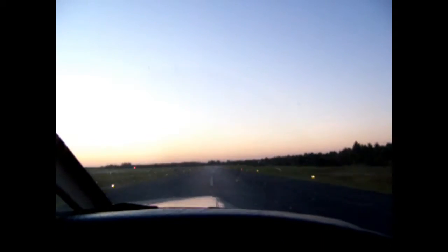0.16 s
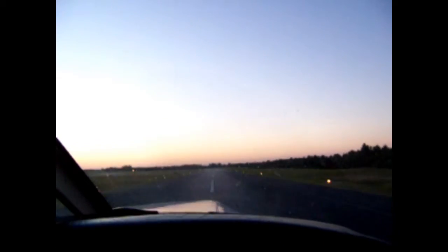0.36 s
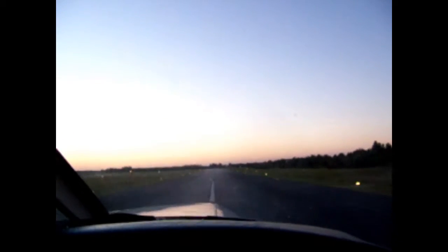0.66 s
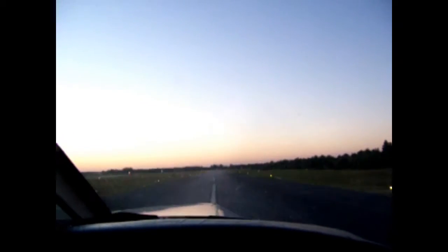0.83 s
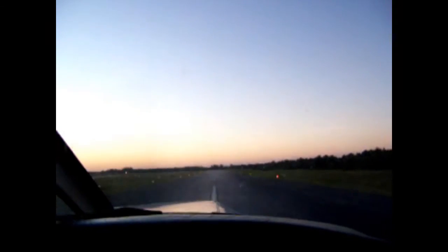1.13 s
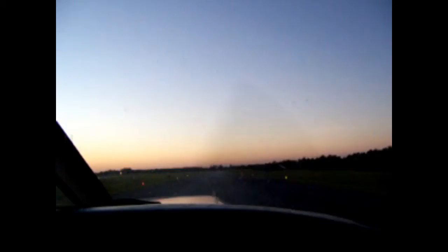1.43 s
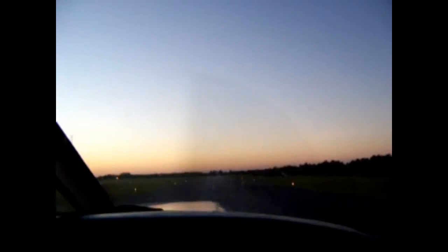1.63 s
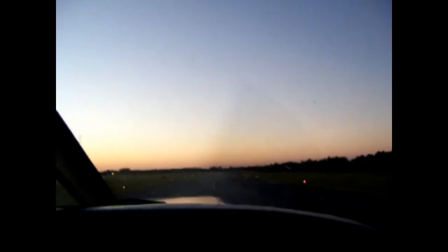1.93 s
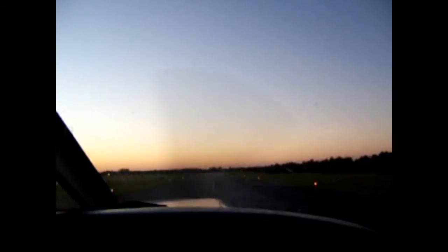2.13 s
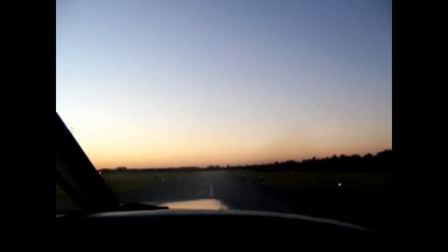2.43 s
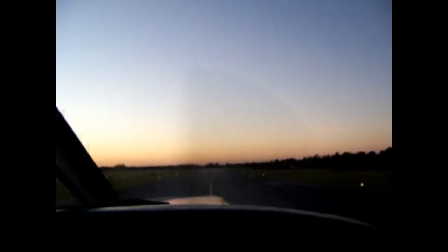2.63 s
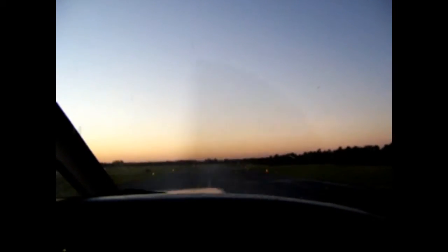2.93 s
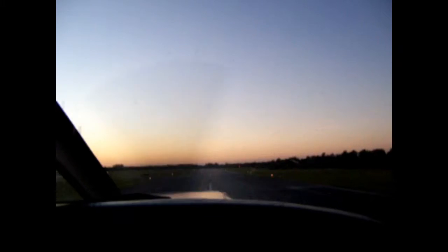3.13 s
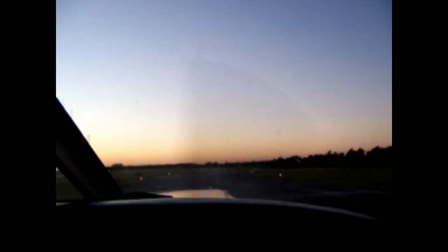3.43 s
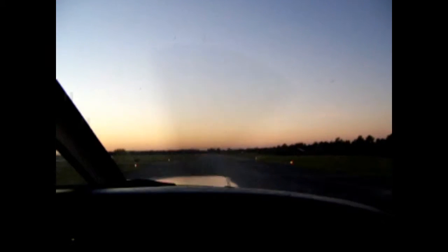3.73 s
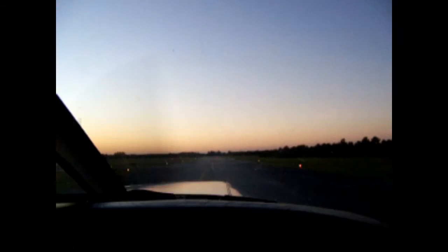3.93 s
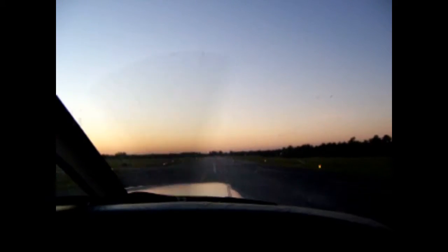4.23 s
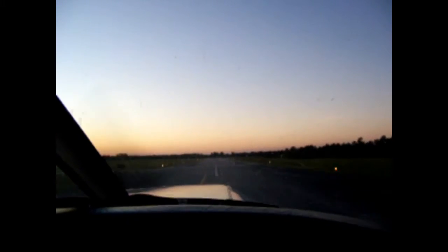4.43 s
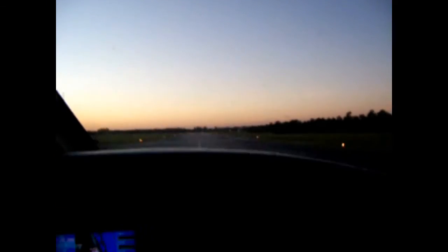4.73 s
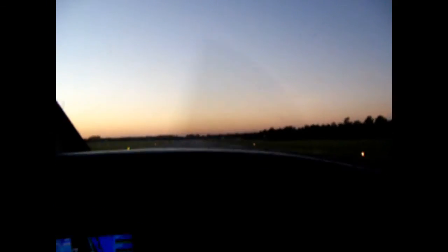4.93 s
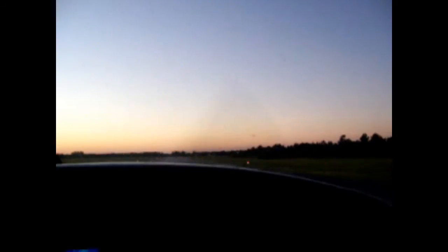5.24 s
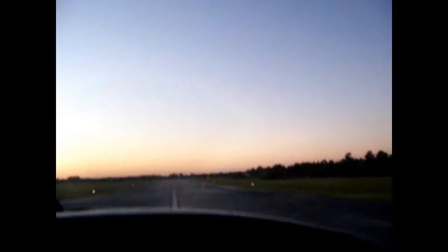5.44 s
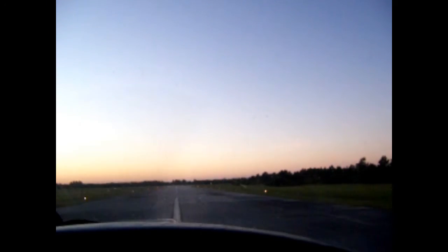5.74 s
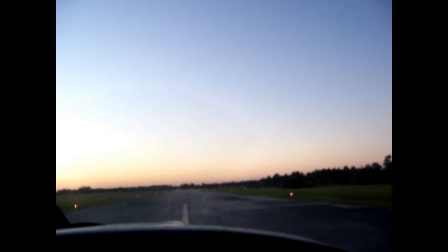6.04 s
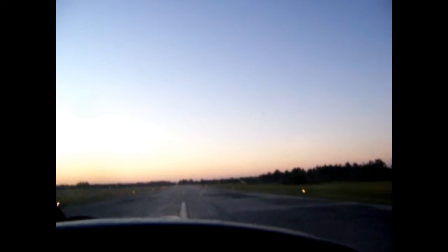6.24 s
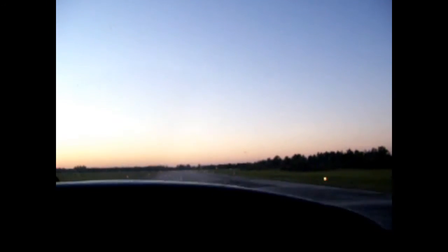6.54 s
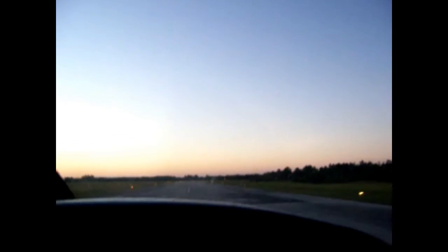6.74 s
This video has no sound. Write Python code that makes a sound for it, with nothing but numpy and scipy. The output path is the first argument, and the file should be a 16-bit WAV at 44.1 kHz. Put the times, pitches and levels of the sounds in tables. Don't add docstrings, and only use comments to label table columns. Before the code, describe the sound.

Low piston aircraft engine drone and rushing air in a cabin, then tyre chirp, heavy touchdown thumps, nose wheel slam and rattling.

```python
import sys
import numpy as np
from scipy import signal
from scipy.fft import rfft, irfft
from scipy.io import wavfile

SR = 44100
rng = np.random.default_rng(int(sys.argv[2]) if len(sys.argv) > 2 else 0)


def gain_from_db(level_db):
    decades = np.asarray(level_db, float) / 20
    return 10 ** decades


def output_pcm(signal):
    pcm = np.clip(np.atleast_2d(signal).T, -1, 1) * 32767
    wavfile.write(sys.argv[1], SR, np.round(pcm).astype(np.int16))


N = 303055
TIME = np.arange(N) / SR

# (time [s], level [dB])
AIRSPEED_DB = [(0, 0.5), (2.5, -1.5), (4.7, -2.5), (4.9, -4.0), (6.0, -4), (6.88, -8)]
# (frequency [Hz], density [dB per Hz])
BUFFET_SPECTRUM = [(7.1, -44), (12, -6), (43, 0), (90, -3), (125, -4.5), (245, -12), (300, -19.5),
                   (390, -58), (660, -120)]
# (frequency [Hz], density [dB per Hz])
ROAR_SPECTRUM = [(94, -34), (160, -10), (252, -11), (291, -6.5), (423, -10), (459, -8), (567, -11.5),
                 (695, -7.5), (1300, -14), (1470, -35), (1800, -41), (2340, -59), (3960, -120)]
# (frequency [Hz], density [dB per Hz])
HISS_SPECTRUM = [(900, -29), (1250, -10.5), (1470, -4.5), (1680, -7), (1870, -12.5), (2130, -9.5),
                 (2600, -11), (2850, -12), (3100, -19.5), (3700, -19), (4500, -23.5), (5000, -44)]
# (frequency [Hz], width [Hz], level [dB])
FLOW_PANELS = [(290.3, 40, -46.5), (466, 60, -39.5), (700, 64, -38.5), (1185, 20, -43.5), (3550, 40, -62)]
# (crest time [s], buffet level [dB])
HEAVES = [
    (.4, -20.5),
    (4.9, -14.5),
    (5.3, -31),
    (5.7, -22.5),
    (6.2, -25.5),
    (6.62, -29.5),
    (6.88, -22),
]
# (frequency [Hz], width [Hz], start [s], level [dB])
FLOOR_PANEL = (202.5, 19, 5, -28.5)
# (time [s], firing rate [Hz])
FIRING_HZ = [(0, 35.2), (.95, 34.85), (1.95, 34.36), (2.95, 33.85), (3.95, 33.5), (4.45, 33.56),
             (5.95, 33.5), (6.88, 33.25)]
# (quarters of firing rate [-], mode [Hz], width [Hz], level on mode [dB])
CABIN_MODES = [(4, 35.3, 1.6, -21.5), (8, 71, 7, -26), (12, 100.6, 4.4, -23), (16, 138, 4.5, -29.5),
               (20, 172.5, 5.5, -30)]
# (quarters of firing rate [-], level [dB])
WEAK_ORDERS = [(2, -43), (3, -36), (5, -37), (6, -41), (10, -40), (14, -42), (15, -40), (24, -41),
               (34, -43)]
# (time [s], peak [dB], centre [Hz])
FITTING_TAPS = [
    (0.104, -22, 2800),
    (4.512, -21, 2400),
    (4.513, -24, 3400),
    (5.622, -16, 2700),
    (5.625, -26, 3530),
    (5.952, -19, 3330),
    (5.954, -21, 2680),
    (5.998, -24, 3500),
]
# (time [s], peak [dB], centre [Hz])
JOINT_TAPS = [
    (4.752, -25, 1060),
    (4.812, -17, 466),
    (4.893, -26, 1190),
    (4.905, -19, 1010),
    (4.922, -16, 910),
    (4.939, -20, 1050),
    (4.955, -16, 700),
    (4.978, -16, 1090),
    (4.994, -17, 545),
    (5.674, -13.5, 830),
]
# (time [s], peak [dB], centre [Hz])
STOP_TAPS = [
    (4.8765, -7, 740),
    (5.668, -10.5, 900),
    (6.041, -25, 1480),
]
# (width over centre [-], t60 [s])
FITTING_SHAPE = (0.21, .045)
JOINT_SHAPE = (0.3, 0.053)
STOP_SHAPE = (0.65, 0.019)
# (time [s], pitch [Hz], level [dB], length [s])
CHIRPS = [
    (4.749, 805, -17.5, .02),
    (4.773, 790, -22, .012),
    (4.797, 872, -22, .028),
    (4.834, 875, -22, .016),
]
# (time [s], shake rate [Hz])
SPIN_HZ = [(6.45, 32), (6.52, 35), (6.63, 39), (6.7, 40.5), (6.75, 44), (6.8, 45), (6.88, 46.5)]
# (mode [Hz], width [Hz], level on mode [dB])
FRAME_MODES = [(42, 6, -19.5), (89, 20, -14.5), (120, 13, -22), (170, 30, -29), (200, 40, -31)]
# (frequency [Hz], width [Hz], level [dB])
RATTLE_PANELS = [(423, 93, -1), (740, 120, -2), (1000, 150, -2), (1185, 45, -1)]
# (time [s], peak [dB], ring [Hz], t60 [s])
GEAR_THUMPS = [
    (4.804, -6, 46, .25),
    (4.86, -1, 43.5, .8),
    (4.8685, -14, 87, .5),
    (4.8713, -13, 131, .4),
    (5.12, -3, 95, .14),
    (6.056, -.5, 61, .24),
               (4.79, -10, 22.4, .4),
    (4.805, -16, 78, 0.22),
    (4.9, -25, 14, .8),
    (4.991, -11, 106, 0.48),
    (5.064, -11, 38.3, 0.39),
    (5.17, -10, 50, 0.48),
    (5.17, -16, 130, 0.97),
    (5.6, -8, 110, 0.17),
    (5.665, -16, 265, 0.26),
]
# (time [s], signed blow strength [-], crash level [dB])
SLAM_BLOWS = [
    (6.0404, 0.51, -13),
    (6.042, -0.79, -6.5),
    (6.048, 0.5, -19),
    (6.057, -0.27, -13),
    (6.066, 0.35, -20),
    (6.08, 0.016, -19),
    (6.093, 0.31, -22),
    (6.127, 0.17, -23),
    (6.151, -0.091, -26),
]
# (frequency [Hz], level [dB], t60 [s])
AIRFRAME_RINGS = [(157, -6, .33), (199, -9, .2), (296, -12, .2), (560, -17, .07), (759, -16, .09),
                  (1190, -15, .1), (1420, -21, .06)]
# (frequency [Hz], density [dB per Hz])
CRASH_SPECTRUM = [(90, -12), (160, -0.5), (450, -11), (700, -7), (985, -17.5), (1230, -11), (1800, -25),
                  (2400, -18.5), (3200, -23), (4500, -26.5), (5000, -58)]

BUFFET_DB, ROAR_DB, HISS_DB = -25, -29, -31
BUFFET_FOLLOWS, ROAR_FOLLOWS = 0.7, 0.067
HEAVE_RISE_S, HEAVE_FALL_S = 0.12, 0.26
CHIRP_EDGE_S, FIRST_SAG_HZ, SAG_S = 0.004, 45, 0.008
SCRUB_START_S, SCRUB_END_S, SCRUB_DB = 4.748, 5.005, -34.5
BITE_DB, BITE_T60_S = -23, 0.3
LOAD_S = 0.077
LAST_JOLT_S, RATTLE_DB, RATTLE_POWER = 6.862, -33.5, 3
SETTLE_S, SETTLE_DB = 6.53, -4
RECORDER_SR_HZ = 8000


def rms_one(x):
    return x / np.sqrt(np.mean(x ** 2) + 1e-20)


def in_time(rows):
    time_s, value = np.transpose(rows)
    return np.interp(TIME, time_s, value)


def drift(rate_hz):
    r = np.exp(-80 * np.pi * rate_hz / SR)
    white = rng.standard_normal(N // 40 + 2002)
    slow = signal.lfilter([1], [1, -2 * r, r * r], white)[2000:]
    return np.interp(np.arange(N) / 40, np.arange(len(slow)), rms_one(slow))


def coloured(spectrum):
    hz = np.arange(1, N // 2 + 2) * SR / N
    at_hz, db = np.transpose(spectrum)
    gain = gain_from_db(np.interp(np.log(hz), np.log(at_hz), db, -90, -90))
    return rms_one(irfft(rfft(rng.standard_normal(N)) * gain, N))


def resonance(x, hz, width_hz):
    r = np.exp(-np.pi * width_hz / SR)
    poles = [1, -2 * r * np.cos(2 * np.pi * hz / SR), r * r]
    return signal.lfilter(np.array([1, 0, -1]) * (1 - r * r) / 2, poles, x)


def panel_hum(hz, width_hz):
    return rms_one(resonance(rng.standard_normal(N), hz, width_hz))


def mode_gain(hz, mode_hz, width_hz, db):
    return gain_from_db(db) / np.sqrt(1 + (2 * (hz - mode_hz) / width_hz) ** 2)


def dying(start_s, t60_s, rise_s):
    t = np.maximum(TIME - start_s, 0)
    return (1 - np.exp(-t / rise_s)) * gain_from_db(-60 * np.minimum(t / t60_s, 3))


def held(start_s, length_s, edge_s):
    nearest_end = np.minimum(TIME - start_s, start_s + length_s + edge_s - TIME)
    return np.clip(nearest_end / edge_s, 0, 1)


def airflow(engine_turn):
    flow_db = in_time(AIRSPEED_DB)
    heave = np.zeros(N)
    for crest_s, db in HEAVES:
        fade_s = np.where(TIME < crest_s, HEAVE_RISE_S, HEAVE_FALL_S)
        heave += gain_from_db(db) * np.exp(-np.abs(TIME - crest_s) / fade_s)
    gust, wash = drift(21), np.sin(engine_turn)
    buffet_gain = np.hypot(gain_from_db(BUFFET_DB + BUFFET_FOLLOWS * flow_db), heave)
    buffet = buffet_gain * gain_from_db(0.8 * drift(15)) * coloured(BUFFET_SPECTRUM)
    roar_db = ROAR_DB + ROAR_FOLLOWS * flow_db + 0.5 * gust + 0.23 * wash + 1.11 * drift(35)
    roar = gain_from_db(roar_db) * coloured(ROAR_SPECTRUM)
    hiss_db = HISS_DB + flow_db + 0.36 * gust + 0.64 * wash + 0.27 * drift(28)
    hiss = gain_from_db(hiss_db) * coloured(HISS_SPECTRUM)
    hum = sum(gain_from_db(db + 1.5 * drift(23)) * panel_hum(hz, width_hz) for hz, width_hz, db in FLOW_PANELS)
    return buffet + roar + hiss + hum * gain_from_db(ROAR_FOLLOWS * flow_db + 0.73)


def rolling():
    hz, width_hz, start_s, db = FLOOR_PANEL
    return gain_from_db(db) * np.clip((TIME - start_s) / 0.68, 0, 1) * panel_hum(hz, width_hz)


def engine():
    firing_hz = in_time(FIRING_HZ)
    turn = 2 * np.pi * np.cumsum(firing_hz * (1 + 0.0008 * drift(3))) / SR
    orders = [(k, mode_gain(k * firing_hz / 4, *mode)) for k, *mode in CABIN_MODES]
    orders += [(k, gain_from_db(db)) for k, db in WEAK_ORDERS]
    tones = np.zeros(N)
    for k, gain in orders:
        tones += gain * gain_from_db(drift(10)) * np.sin(k * turn / 4 + rng.uniform(0, 2 * np.pi))
    settling = np.clip((TIME - SETTLE_S) / LOAD_S, 0, 1)
    return np.sqrt(2) * tones * gain_from_db(SETTLE_DB * settling), turn


def taps(rows, shape):
    out, t = np.zeros(N), TIME[:SR // 8]
    spread, t60_s = shape
    for start_s, db, hz in rows:
        jitter = rng.standard_normal(len(t)) * gain_from_db(-60 * t / t60_s)
        jitter[0] += 12
        burst = resonance(resonance(jitter, hz, spread * hz), hz, spread * hz)
        out[round(start_s * SR):][:len(t)] += gain_from_db(db) * burst / np.abs(burst).max()
    return out


def fittings():
    return taps(FITTING_TAPS, FITTING_SHAPE) + taps(JOINT_TAPS, JOINT_SHAPE) + taps(STOP_TAPS, STOP_SHAPE)


def tyre():
    starts_s, pitches_hz = np.transpose(CHIRPS)[:2]
    hz = pitches_hz[np.maximum(np.searchsorted(starts_s, TIME) - 1, 0)]
    hz = hz - FIRST_SAG_HZ * held(starts_s[0], SAG_S + CHIRP_EDGE_S * 2, SAG_S)
    phase = 2 * np.pi * np.cumsum(hz * (1 + 0.012 * drift(120))) / SR
    grip = sum(gain_from_db(db) * held(start_s, length_s, CHIRP_EDGE_S) for start_s, _, db, length_s in CHIRPS)
    squeal = grip * gain_from_db(drift(80)) * np.sqrt(2) * np.sin(phase)
    scrub = gain_from_db(SCRUB_DB) * held(SCRUB_START_S, SCRUB_END_S - SCRUB_START_S, 0.0093)
    bite = gain_from_db(BITE_DB) * dying(SCRUB_START_S, BITE_T60_S, 0.003)
    rubber = rms_one(resonance(resonance(rng.standard_normal(N), 910, 550), 890, 560))
    return squeal + (scrub + bite) * gain_from_db(1.8 * drift(60)) * rubber


def nose_wheel():
    spin_hz = in_time(SPIN_HZ)
    turn = 2 * np.pi * np.cumsum(spin_hz) / SR
    turn = turn - turn[round(LAST_JOLT_S * SR)]
    shake = np.zeros(N)
    for k, mode in enumerate(FRAME_MODES, start=1):
        shake += np.sqrt(2) * mode_gain(k * spin_hz, *mode) * np.cos(k * turn)
    jolts = rng.standard_normal(N) * gain_from_db(6 * np.cos(turn / 2 + 2))
    rattle = sum(gain_from_db(db) * rms_one(resonance(jolts, hz, width_hz)) for hz, width_hz, db in RATTLE_PANELS)
    rattle_gain = gain_from_db(RATTLE_DB) * (spin_hz / spin_hz[-1]) ** RATTLE_POWER
    load = np.clip((TIME - SPIN_HZ[0][0]) / LOAD_S, 0, 1)
    return load * (shake + rattle_gain * rattle)


def gear():
    out = np.zeros(N)
    for start_s, db, hz, t60_s in GEAR_THUMPS:
        out -= gain_from_db(db) * dying(start_s, t60_s, 0.005) * np.sin(2 * np.pi * hz * (TIME - start_s))
    return out


def nose_slam():
    blows = np.full(N, 1e-18)
    crash_gain = np.zeros(N)
    for start_s, blow, db in SLAM_BLOWS:
        blows[round(start_s * SR)] = blow
        crash_gain += gain_from_db(db) * dying(start_s, 0.099, 0.00039)
    out = coloured(CRASH_SPECTRUM) * crash_gain
    for hz, db, t60_s in AIRFRAME_RINGS:
        r, w = gain_from_db(-60 / (t60_s * SR)), 2 * np.pi * hz / SR
        out += gain_from_db(db) * signal.lfilter([0, np.sin(w)], [1, -2 * r * np.cos(w), r * r], blows)
    return out


def scene():
    drone, engine_turn = engine()
    background = airflow(engine_turn) + rolling() + drone
    touchdown = fittings() + tyre() + nose_wheel() + gear() + nose_slam()
    return (background + touchdown)[None]


def roll_off(x):
    return signal.sosfilt(signal.butter(12, 16000, fs=SR, output="sos"), x)


def record(dry):
    band = signal.sosfilt(signal.cheby2(10, 60, 5200, fs=SR, output="sos"), dry[0])
    clipped = np.clip(band, -1.1, 0.9)
    drooped = signal.lfilter(*signal.butter(1, 9, "high", fs=SR), clipped)
    ticks_s = np.arange(N * RECORDER_SR_HZ // SR + 2) / RECORDER_SR_HZ
    coarse = np.clip(np.interp(ticks_s, TIME, drooped), -0.99, 0.99)
    joined = np.interp(TIME, ticks_s, coarse)
    smooth = signal.sosfilt(signal.cheby2(14, 40, 15900, fs=SR, output="sos"), joined)
    return roll_off(smooth[None])


dry = scene()
out = record(dry)
output_pcm(out)
```